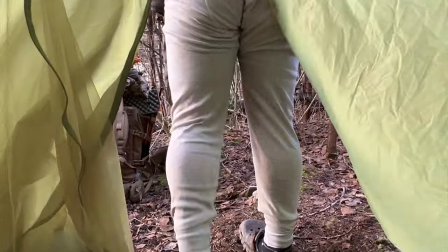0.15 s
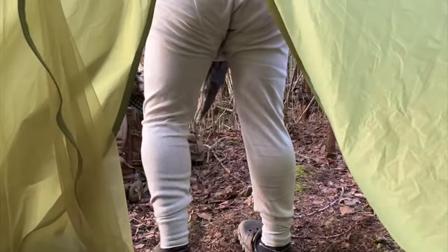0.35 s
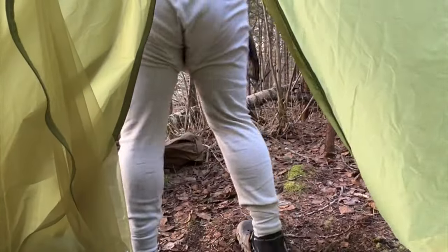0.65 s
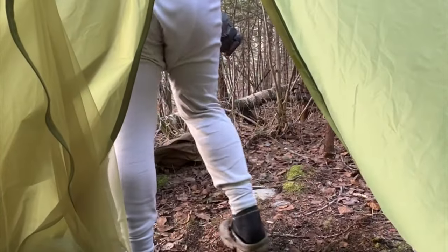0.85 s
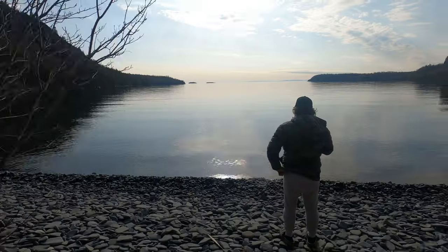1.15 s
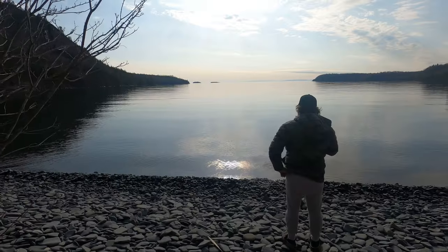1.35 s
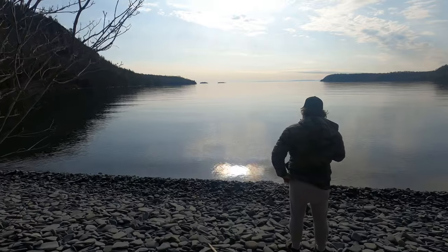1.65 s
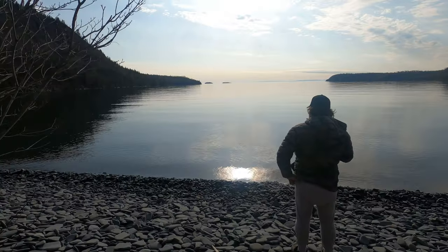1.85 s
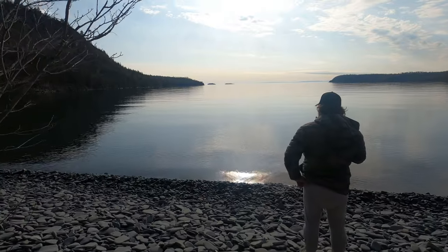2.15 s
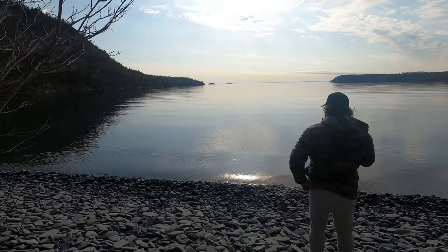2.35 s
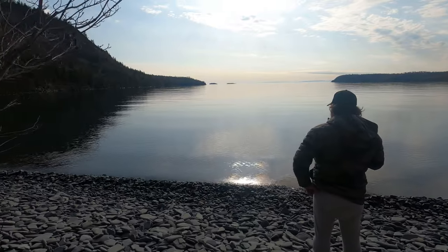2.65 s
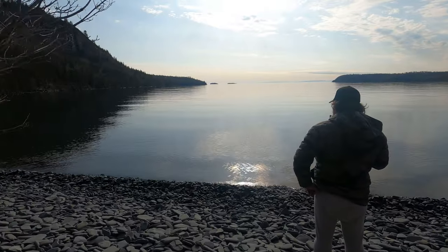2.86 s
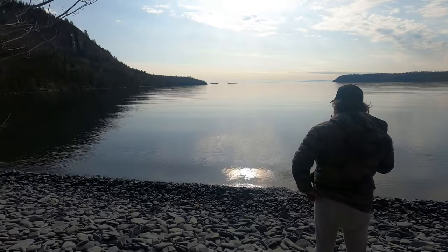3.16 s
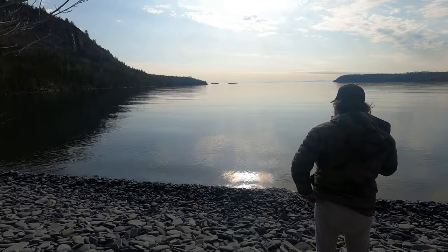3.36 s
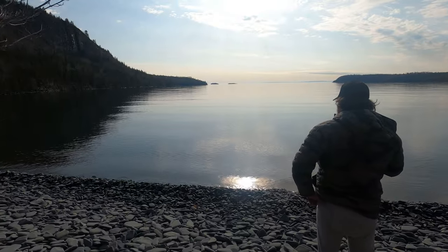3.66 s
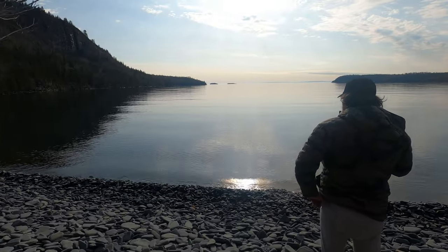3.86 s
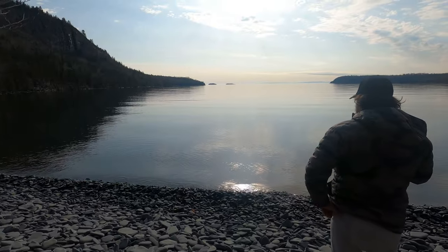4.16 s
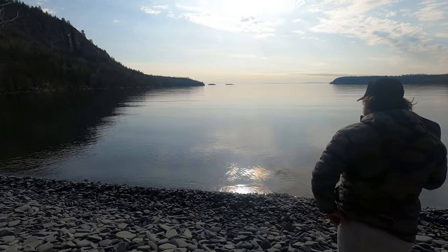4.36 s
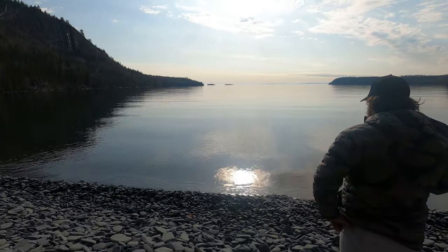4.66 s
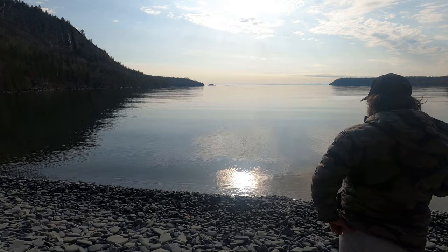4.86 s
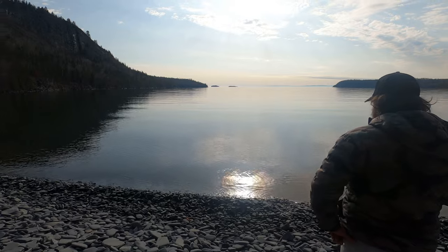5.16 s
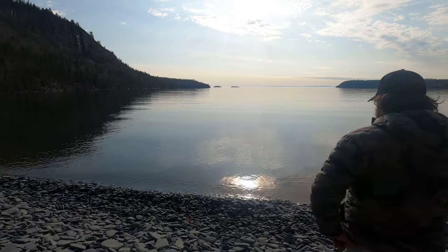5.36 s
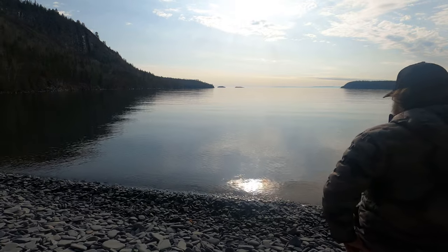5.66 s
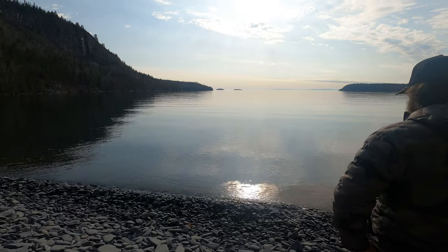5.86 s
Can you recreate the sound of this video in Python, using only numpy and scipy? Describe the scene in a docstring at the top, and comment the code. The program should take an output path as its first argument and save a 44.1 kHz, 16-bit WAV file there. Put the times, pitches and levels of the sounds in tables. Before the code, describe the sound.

From 0 to 1.2 s it is very quiet: soft stereo rustling of tent fabric and clothes, strongest at the very start, with tiny ticks around 0.2, 0.4 and 0.9 s. A hard cut at 1.2 s opens a louder, centred pebble beach. A scrape and sharp clatter come at once, more stones knock at 1.65 s, then a crunchy step with a dragged sole at 2.1-2.4 s. After a lull of faint water wash, a longer clatter runs 2.9-3.2 s, ending in a bright crack. Another lull, then clacks at 3.8-3.95 s, a short scrape and a blunt microphone bump at 4.16 s. Soft murmuring water remains until a brief step at 5.0 s, a crack at 5.2 s and a hard, ringing cluster at 5.35-5.5 s. The final loud crunch begins around 5.9 s and is cut short at 6 s. Close, dry, no echo.

```python
"""Stones clack, ring and grind under uneven steps on a pebble beach, as damped modes and shaped noise bursts.
Soft shore wash is coloured noise, dragged soles are narrow noise bands, and knocks on the microphone are
flicks with a slow settling. Before this beach, heard in mono, comes a wood in stereo: a tent flap and
clothes rustle faintly as noise in three bands, with small ticks of twig and cloth."""
import sys
import numpy as np
from scipy import signal
from scipy.fft import rfft, irfft
from scipy.io import wavfile
from scipy.ndimage import uniform_filter1d

SR = 44100
rng = np.random.default_rng(int(sys.argv[2]) if len(sys.argv) > 2 else 0)


def log_audio(samples):
    """Write samples as a 16-bit WAV file to the path given in sys.argv[1]."""
    # one column per channel
    frames = np.atleast_2d(samples).T
    # limit to full scale, then quantise
    limited = np.clip(frames, -1, 1)
    pcm = np.round(limited * 32767).astype(np.int16)
    wavfile.write(sys.argv[1], SR, pcm)


N = 264600

CUT_S = 1.19  # the wood ends, the beach begins


def amp(db):
    """Amplitude ratio of a level in decibels: 20 dB per factor of ten."""
    return 10 ** (np.asarray(db) / 20)


def evened(x):
    """Normalisation to unit root-mean-square amplitude."""
    return x / np.sqrt(np.mean(x ** 2) + 1e-20)


def read(points, hz):
    """Spectral level interpolated along a logarithmic frequency axis, -120 dB outside the points."""
    f, level_db = np.transpose(points)
    return np.interp(np.log(hz + 1), np.log(f + 1), level_db, left=-120, right=-120)


def add(mix, s, sound):
    """Superposition: adds sound to mix in place, from time s on."""
    part = mix[round(s * SR):][:len(sound)]
    part += sound[:len(part)]


def colour(x, points):
    """Spectral shaping: weights the spectrum of x by points, then sets its rms to 1."""
    weights = amp(read(points, np.fft.rfftfreq(N, 1 / SR)))
    return evened(irfft(rfft(x) * weights, N))


def band(x, lo_hz, hi_hz):
    """Band-pass filtering with a Butterworth response."""
    return signal.sosfilt(signal.butter(4, [lo_hz, hi_hz], "band", fs=SR, output="sos"), x)


def highpass(x, order, hz):
    """High-pass filtering with a Butterworth response."""
    return signal.sosfilt(signal.butter(order, hz, "high", fs=SR, output="sos"), x)


def split(x, hz):
    """Complementary crossover: the parts of x below and above hz, which sum to x."""
    low = irfft(rfft(x) / (1 + (np.fft.rfftfreq(N, 1 / SR) / hz) ** 6), N)
    return low, x - low


def flutter(grain_db, size):
    """Random amplitude modulation: a gain that varies by grain_db rms, smoothed over size samples."""
    return amp(grain_db * evened(uniform_filter1d(rng.standard_normal(N), size)))


def hiss(grain_db, size):
    """White noise under random amplitude modulation."""
    return rng.standard_normal(N) * flutter(grain_db, size)


def modes(t, hz, db, t60):
    """Modal superposition: exponentially damped sines of random sign, losing 60 dB in t60."""
    hz, db, t60 = (np.asarray(v)[:, None] for v in (hz, db, t60))
    sign = rng.choice([-1, 1], hz.shape)
    return (sign * amp(db - 60 * t / t60) * np.sin(2 * np.pi * hz * t)).sum(0)


def strokes(start, length, db, rise, fall_db):
    """Incoherent addition of envelopes that rise ahead of start, hold for length and fall by fall_db per s."""
    clock = np.arange(0, N / SR, .001)
    t = clock - start[:, None]
    onset = np.clip(1 + t / rise, 0, 1) ** 2
    shape = onset * amp(db[:, None] - fall_db * np.maximum(t - length[:, None], 0))
    return np.interp(np.arange(N) / SR, clock, np.sqrt((shape ** 2).sum(0)))


def tent():
    """Friction noise of cloth in three bands, as a mid part and a side part of independent noise."""
    # cloth brushed or dragged: full level at t/s, hold/s, treble swish level/dB,
    # body relative to treble/dB, rumble relative to treble/dB
    swishes = [(0, 0.11, -57, -4.5, -11.5), (0.11, 0.16, -71, 6.5, -4), (0.295, 0.081, -77.5, 6, -4),
               (.42, 0.13, -66.5, 2, 1.5), (0.567, 0.25, -73, 2, -1.5), (0.813, 0.061, -62.5, -5, -27),
               (0.914, 0.073, -77.5, 6, -18)]
    # the wood between swishes: treble level/dB, body level/dB, rumble level/dB
    still_db = (-86, -77.5, -76.5)
    # spectrum heard by both sides: f/Hz, relative level per Hz/dB
    mid_spectrum = [(15, -33), (25, 2.5), (80, 11), (450, -9.5), (950, -4.5), (1400, -9.5), (4600, -13),
                    (6000, -7), (9500, -13), (12300, -17.5), (13500, -58)]
    # spectrum of the left-right difference: f/Hz, relative level per Hz/dB
    side_spectrum = [(35, -38), (60, -25), (790, -10.5), (1880, -21.5), (2820, -17), (5400, -16),
                     (9800, -17), (12700, -12), (14000, -38)]
    rise_s, fall_db_per_s = 0.033, 350
    s, length, swish_db, body_db, rumble_db = np.transpose(swishes)
    gains = []
    for relative_db, floor_db in zip((0, body_db, rumble_db), still_db):
        swish = strokes(s, length, swish_db + relative_db, rise_s, fall_db_per_s)
        gains.append(np.hypot(swish, amp(floor_db)))
    out = []
    for points, trims_db in ((mid_spectrum, (0, 0, 0)), (side_spectrum, (-3, .1, -8))):
        rumble, rest = split(colour(hiss(1.2, size=200), points), 265)
        body, treble = split(rest, 3740)
        rumble = rumble * flutter(3, size=1200)  # folds pass in lumps
        body = body * flutter(2.5, size=500)
        parts = zip((treble, body, rumble), gains, trims_db)
        out.append(sum(evened(p) * gain * amp(trim_db) for p, gain, trim_db in parts))
    return out


def ticks():
    """Impulsive excitation of twig and cloth: a decaying sine mixed with band-passed noise."""
    # t/s, level before an 8.5 dB cut/dB, f/Hz
    tick_list = [(0.232, -47, 920), (0.442, -48, 926), (0.892, -42, 965), (0.967, -45.5, 1540)]
    out, t = np.zeros(N), np.arange(600) / SR
    for s, db, hz in tick_list:
        noise = band(rng.standard_normal(len(t)), 1000, 9400)
        tone = np.sin(2 * np.pi * hz * t)
        add(out, s, amp(db - 8.5 - 60 * t / 0.029) * (tone + 0.43 * noise))
    return out


def wood():
    """Mid-side stereo: left and right are the sum and difference of the shared and the opposed part."""
    mid, side = tent()
    small = ticks()
    mid, side = mid + small, side + 0.63 * small
    return np.array([mid + side, mid - side]) * np.clip((CUT_S - np.arange(N) / SR) / 0.0018, 0, 1)


def shore():
    """Broadband turbulence of distant water: a wash and a lumpy low murmur, as coloured noise."""
    # swell of the water: t/s, wash level/dB, murmur relative to wash/dB
    swell = [(1.19, -60.5, -3), (1.998, -68, -21), (2.7, -68, -2), (3.3, -69, -5), (3.55, -61, -2.5),
             (3.8, -62, -1.5), (4.5, -62.5, -11), (4.85, -67, -6.5), (6, -65, -15.5)]
    # spectrum of the water: f/Hz, relative level per Hz/dB
    water_spectrum = [(59, -63), (100, -45), (144, -14), (275, -2.5), (789, -24), (1110, -16.5),
                      (1960, -20), (2550, -24), (6740, -44), (12600, -57.5), (16400, -90), (22000, -120)]
    t = np.arange(N) / SR
    s, db, murmur_db = np.transpose(swell)
    murmur, wash = split(colour(hiss(1.4, size=300), water_spectrum), 430)
    wash = evened(wash) * amp(np.interp(t, s, db))
    lumps = flutter(1.2, size=900)
    return wash + evened(murmur) * lumps * amp(np.interp(t, s, db + murmur_db))


def grind():
    """Granular contact: dense random knocks smeared into a crunch, over the dull push of the foot."""
    # a sole rolls over the stones: full level at t/s, hold/s, grind level/dB, weight relative to grind/dB
    steps = [(1.278, 0.017, -52.5, -10), (1.407, 0.057, -58.5, 3.5), (1.587, 0.17, -58.5, -3.5),
             (2.104, 0.065, -57.5, 0), (2.225, 0.081, -58.5, -6), (2.365, 0.061, -57, -6.5),
             (2.889, 0.22, -55, -2.5), (3.17, 0.02, -55, 0), (3.81, 0.085, -57.5, 3.5),
             (3.989, 0.083, -54.5, -22), (5.011, 0.046, -54, -4), (5.145, 0.11, -60.5, -17),
             (5.354, 0.093, -48.5, -2), (5.926, .2, -47.5, -1)]
    # spectrum of the crunch: f/Hz, relative level per Hz/dB
    gravel_spectrum = [(290, -29), (500, -24), (709, -6), (1390, -5.5), (2330, -7), (4390, -22),
                       (5060, -22.5), (11000, -47), (14300, -87), (22000, -120)]
    rise_s, fall_db_per_s = 0.081, 147.5
    settle_db = -76.5  # loose stones keep shifting between steps
    s, length, db, weight_db = np.transpose(steps)
    happens = rng.random(N) < 900 / SR  # about 900 knocks per second
    hits = amp(6.4 * np.minimum(rng.exponential(1, N), 4)) * happens
    tails = signal.lfilter([1], [1, -np.exp(-1 / (0.0012 * SR))], hits)  # 1.2 ms time constant
    crunch = colour((evened(tails) + 1.1) * rng.standard_normal(N), gravel_spectrum)
    push = evened(band(hiss(5.04, size=500), 167.4, 553))
    sole = strokes(s, length, db, rise_s, fall_db_per_s)
    weight = strokes(s, length, db + weight_db, rise_s, fall_db_per_s)
    return np.hypot(sole, amp(settle_db)) * crunch + weight * push


def scrapes():
    """Stick-slip friction: fast uneven slips, confined to the band in which the rubbed stones speak."""
    # a sole dragged across the stones: start t/s, end t/s, low f/Hz, high f/Hz, level/dB
    drags = [(1.234, 1.287, 1000, 3040, -41), (2.14, 2.333, 1100, 2470, -49.5),
             (3.996, 4.1, 1190, 2880, -49.5), (5.081, 5.207, 2320, 3140, -60)]
    slip_db = 4  # unevenness of the slips
    t, out = np.arange(N) / SR, np.zeros(N)
    for start, end, lo_hz, hi_hz, db in drags:
        rub = evened(band(hiss(slip_db, size=120), lo_hz, hi_hz))
        gain = np.clip(np.minimum((t - start) / 0.043, (end - t) / 0.017), 0, 1)
        out += amp(db) * rub * gain
    return out


def clacks():
    """Impact of stone on stone: modes in a gritty burst, a harder edge, a treble crack, a thud and a rattle."""
    # t/s, peak level without thud/dB, main mode f/Hz, hardness as edge gain/dB
    blows = [(1.2727, -13, 2310, -1), (1.2787, -19.5, 2170, -13), (1.2855, -19.5, 2490, -26),
             (1.3067, -26, 2120, 6), (1.3244, -20.5, 2500, 8), (1.3464, -28.5, 3000, 6),
             (1.418, -33, 2180, 1), (1.432, -34.5, 2054, 1), (1.502, -33, 2470, -10),
             (1.5955, -33, 2500, 2.5), (1.608, -33.5, 2110, 3), (1.642, -31.5, 1820, -26),
             (1.6625, -21.5, 1047, -0.5), (1.6713, -19.5, 2060, -8.5), (1.6845, -18.5, 2050, -6),
             (1.738, -26, 1740, -30), (1.831, -38, 2720, 4), (2.022, -44.5, 2200, -16),
             (2.0983, -18.5, 1460, -5), (2.1185, -14.5, 3590, -1.5), (2.1282, -23, 1370, -13),
             (2.1532, -24.5, 1730, -21), (2.1642, -29.5, 1620, -35), (2.181, -34, 1500, -25),
             (2.22, -25, 2090, -38), (2.234, -32.5, 1790, -32), (2.3059, -37.5, 1630, 13),
             (2.3532, -23.5, 2740, 11), (2.3577, -19.5, 2850, -6), (2.3836, -30, 1980, -22),
             (2.3949, -34, 3540, -10), (2.4147, -36, 1010, -12), (2.8199, -38, 1310, -29),
             (2.8845, -34, 1290, -22), (2.904, -23.5, 1145, -22), (2.921, -32, 3250, -4.5),
             (2.942, -29.5, 1060, -5), (2.957, -25, 1270, -1.5), (2.9683, -29, 940, -7),
             (2.9768, -15.5, 1400, 0), (2.9894, -15.5, 1404, 0), (3.0282, -17.5, 1275, -10),
             (3.0326, -16.5, 1820, 1), (3.0541, -27.5, 1016, -18), (3.0616, -25.5, 2480, 1),
             (3.126, -34.5, 1120, -2), (3.164, -11.5, 3470, -1.5), (3.1764, -22, 1210, -33),
             (3.1914, -32, 2420, -8), (3.7869, -46.5, 1180, -23), (3.8196, -39, 1530, -30),
             (3.826, -27, 1470, -36), (3.8402, -20.5, 2604, -12), (3.848, -18.5, 2240, -6),
             (3.858, -18.5, 2420, -25), (3.892, -23.5, 1510, -5), (3.921, -34, 2160, -14),
             (3.935, -13.5, 2626, -1), (4.0019, -36, 1640, -26), (4.11, -30.5, 1950, -21),
             (4.237, -41, 1300, -15), (4.9295, -33.5, 1020, -26), (5.001, -40, 1895, -20),
             (5.0138, -35, 1570, -19), (5.022, -19.5, 1760, -13), (5.059, -42, 1340, 3),
             (5.066, -30, 1415, -2.5), (5.183, -38.5, 1800, -20), (5.2122, -14.5, 3263, -5),
             (5.2381, -24, 2170, -1.5), (5.317, -42, 2000, -13), (5.3339, -25, 1450, -26),
             (5.3401, -20, 2180, -11), (5.3647, -19.5, 2080, -8), (5.373, -11, 2400, 5.5),
             (5.3835, -12.5, 2340, 7.5), (5.4029, -21, 2350, -8), (5.428, -9, 3286, 11.5),
             (5.45, -24.5, 2290, -14.5), (5.483, -29.5, 2330, -20.5), (5.5136, -28.5, 1890, -6.5),
             (5.796, -41.5, 1147, 1.5), (5.9083, -16, 2750, 4), (5.916, -11.5, 1795, 3),
             (5.9419, -20, 2480, -1), (5.9533, -21, 2270, -7), (5.958, -16.5, 2600, -11),
             (5.965, -30, 2500, 3), (5.975, -10, 2680, -2.5), (5.9889, -10, 2750, -0.5),
             (5.9957, -8, 2690, -4)]
    thud_db = -25.5  # each blow also thuds into the bed of stones
    crack_db, crack_per_edge, crack_top_db = -17, 2.4, -7.5  # crack grows with hardness, up to a limit
    out, t = np.zeros(N), np.arange(4000) / SR
    touch = np.sin(np.pi / 2 * np.minimum(t / .0003, 1)) ** 2  # rounded stones meet softly
    for s, db, hz, edge_db in blows:
        others = hz * np.exp(rng.uniform(-0.63, 0.593, size=4))  # every stone has its own shape
        mode_db = np.r_[0, rng.normal(-8, 3, size=4)]
        stone = modes(t, np.r_[hz, others], mode_db, 0.019 * rng.uniform(0.95, 1.17, size=5))
        noise = rng.standard_normal((4, len(t)))
        grit_db = 1.5 * evened(uniform_filter1d(rng.standard_normal(len(t)), size=60))
        bounce = np.maximum(t - rng.uniform(0.0019, .007), 0)  # the stone hops once and lands again
        blow = amp(-60 * t / 0.0069)
        landing = amp(-6.5 - 60 * bounce / 0.0049) * (bounce > 0)
        rattle = amp(-10 - 60 * t / 0.073 + grit_db)  # neighbouring stones
        burst = noise * (blow + landing + rattle) * touch
        body = band(stone * touch + amp(3.0) * burst[0], 0.31 * hz, 3227)  # small stones have little bass
        edge = amp(edge_db) * band(burst[1], 3330, 5020)
        crack_gain = amp(min(crack_db + crack_per_edge * edge_db, crack_top_db))
        clack = body + edge + crack_gain * band(burst[2], 4100, 7730)
        thud = amp(thud_db) * evened(band(noise[3], 90, 547))
        thud = thud * amp(-60 * t / 0.035) * np.minimum(t / 0.0038, 1)
        add(out, s, amp(db) * (clack / abs(clack).max() + thud))
    return out


def rings():
    """Resonance of hard stones after a blow: high modes blurred into decaying narrow bands of noise."""
    # t/s, lowest mode f/Hz, level before a 5 dB cut/dB, upper modes relative to lowest/dB, t60/s
    singing = [(1.273, 8290, -45, -19, 0.05), (2.991, 6270, -33, -35, 0.072), (3.029, 7600, -56, -29, 0.24),
               (3.84, 4870, -30, -21, 0.082), (3.935, 4960, -56, 13.5, 0.083), (5.02, 4420, -51, 5, 0.04),
               (5.34, 4720, -44, -24, 0.064), (5.374, 4710, -31, -9, 0.14), (5.429, 4810, -39.5, -2, 0.23),
               (5.975, 5720, -30, -12, 0.036), (5.99, 8240, -35, -20, .045)]
    # upper modes: f relative to lowest/1, further level/dB
    overtones = [(1.5, -2), (1.63, -13.5), (1.98, -16)]
    out, t = np.zeros(N), np.arange(9000) / SR
    for s, low_hz, db, upper_db, t60 in singing:
        partials = [(low_hz, 0)] + [(low_hz * ratio, upper_db + d) for ratio, d in overtones]
        for hz, mode_db in partials:
            noise = band(rng.standard_normal(2 * len(t)), hz - 110, hz + 110)
            blurred = evened(noise[len(t):])  # without the filter's onset
            decay = amp(db + mode_db - 5.0 - 60 * t / t60)
            add(out, s, decay * blurred * (1 - np.exp(-t / 0.0015)))
    return out


def knocks():
    """Transient response: the housing flicks back and forth; the capsule follows more slowly and settles."""
    # on the microphone body: t/s, gain of the jump/dB
    jumps = [(4.1552, -32), (4.1668, -9.5), (4.179, -21)]
    out, u = np.zeros(N), np.arange(-200, 9000) / SR
    flick = np.cos(2 * np.pi * 600 * u) * np.exp(-(u / 0.00079) ** 2)
    settle = 2 * (1 - np.exp(-abs(u) / 0.0003)) * np.exp(-abs(u) / 0.014) * (u > 0)
    reversal = np.tanh(u / .00008)  # turns the sign at the jump
    for s, db in jumps:
        add(out, s + u[0], amp(db) * (flick + settle) * reversal)
    return out


def scene():
    """Superposition of sources: the stereo wood, then the beach through a wind filter, over faint hiss."""
    beach = shore() + grind() + scrapes() + clacks() + rings() + knocks()
    beach *= np.clip((np.arange(N) / SR - CUT_S) / 0.0013, 0, 1)
    wind_filtered = highpass(beach, 6, 138)
    slipped = highpass(beach, 2, 55)  # a little bass slips past the wind filter
    faint = amp(-100) * rng.standard_normal((2, N))  # electronic hiss, own in each channel
    return wood() + wind_filtered + amp(-19.5) * slipped + faint


def record(dry):
    """Band limitation: a linear-phase low-pass at 12780 Hz."""
    lowpass = signal.firwin(511, 12780, window=("kaiser", 9), fs=SR)
    return signal.oaconvolve(dry, lowpass[None], "same")


dry = scene()
out = record(dry)
log_audio(out)
```